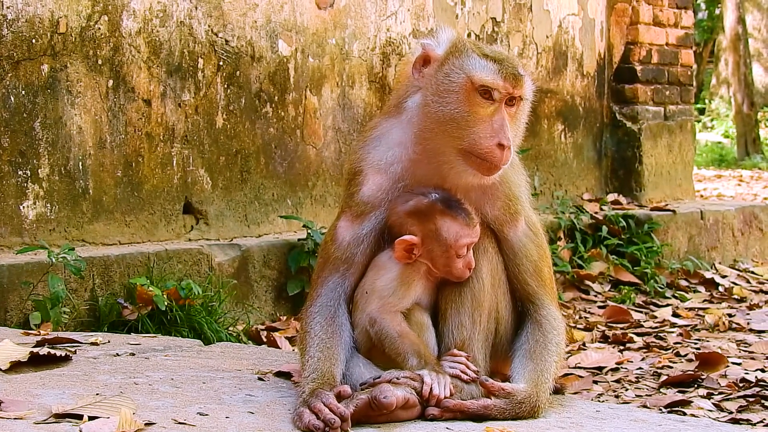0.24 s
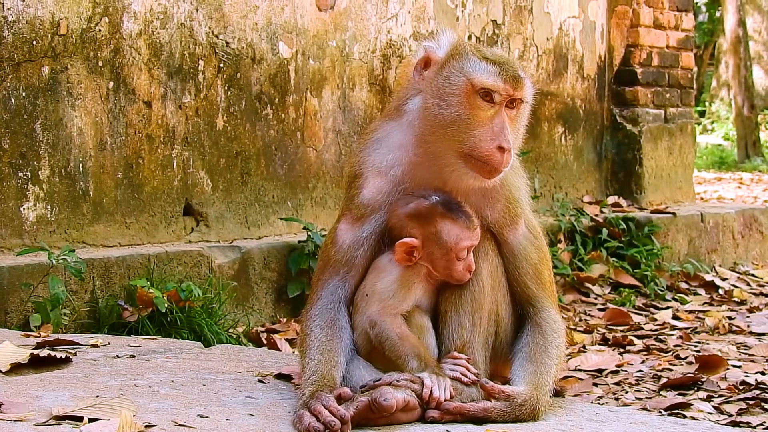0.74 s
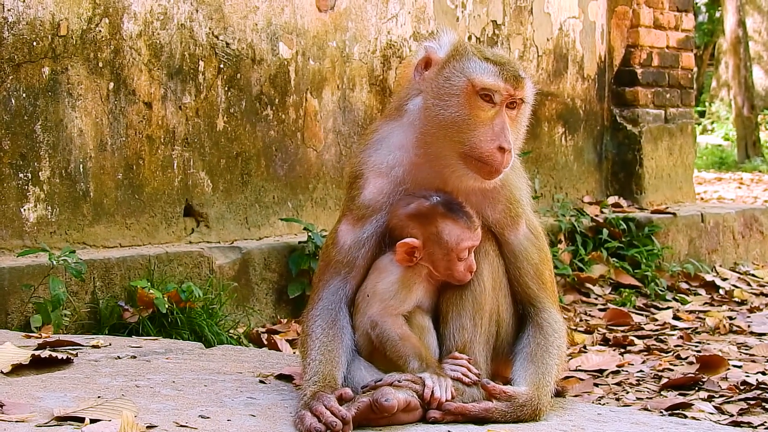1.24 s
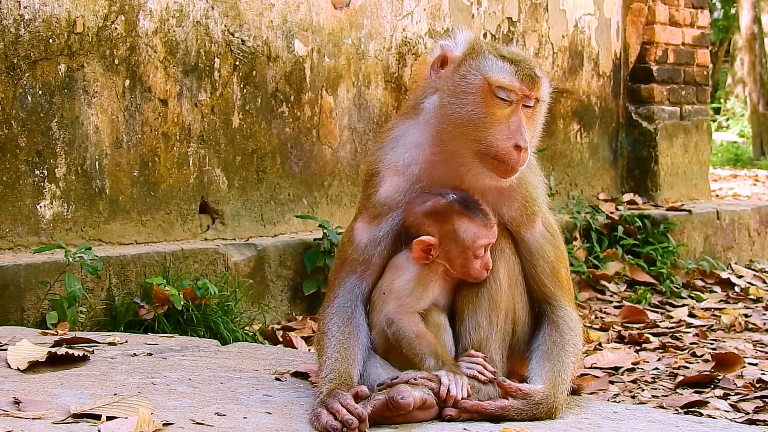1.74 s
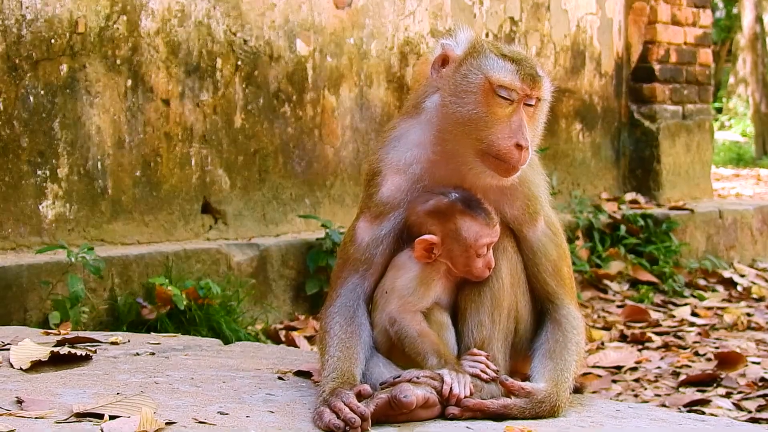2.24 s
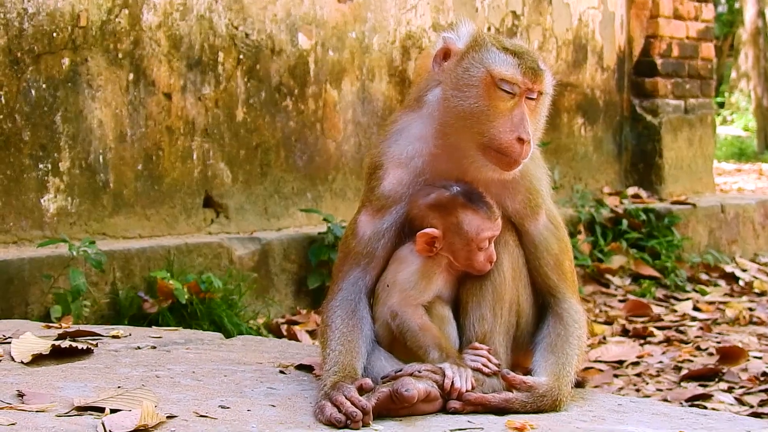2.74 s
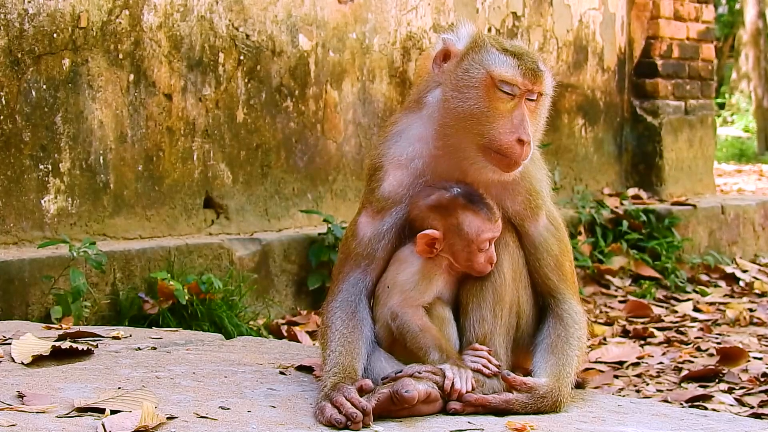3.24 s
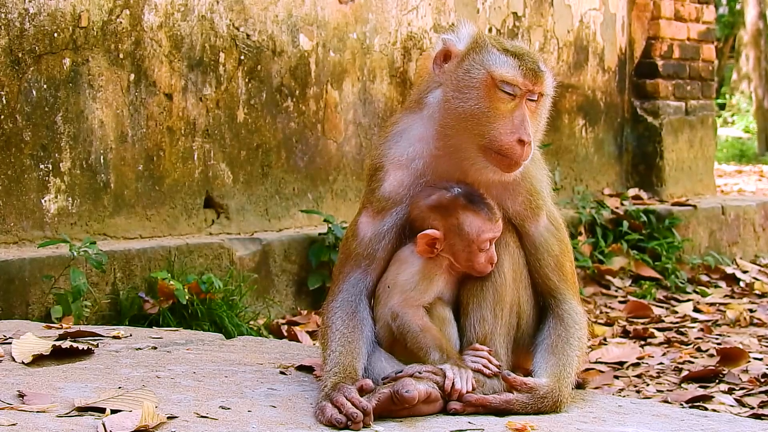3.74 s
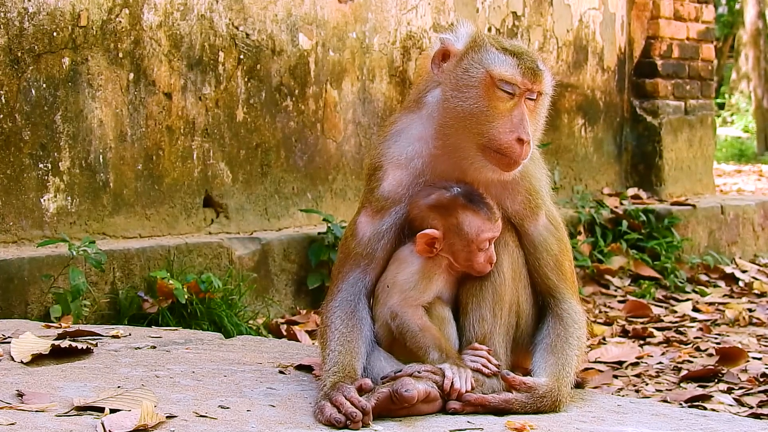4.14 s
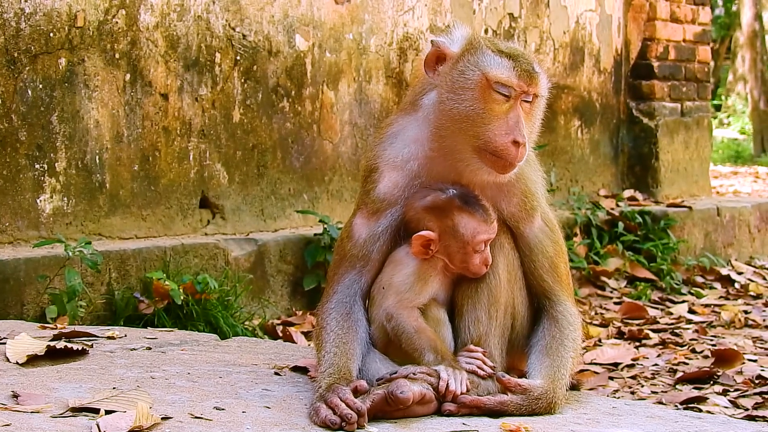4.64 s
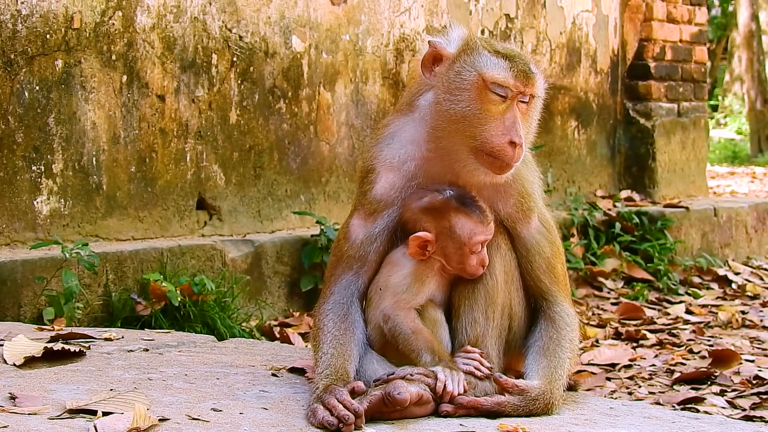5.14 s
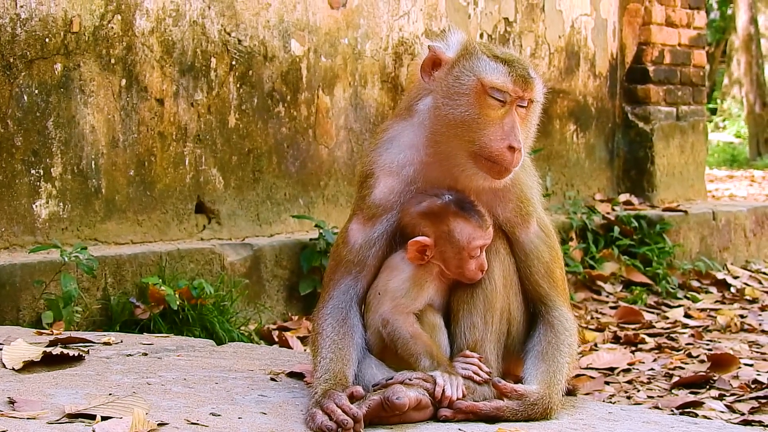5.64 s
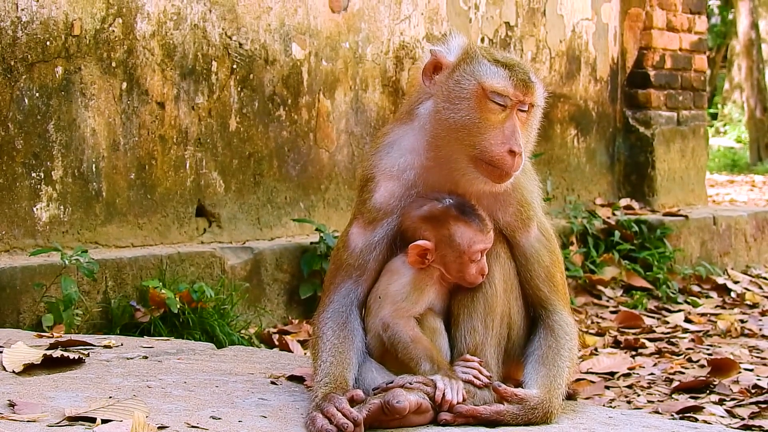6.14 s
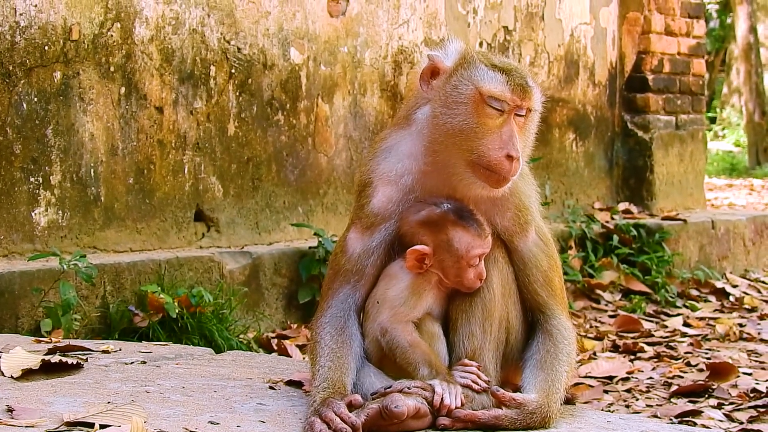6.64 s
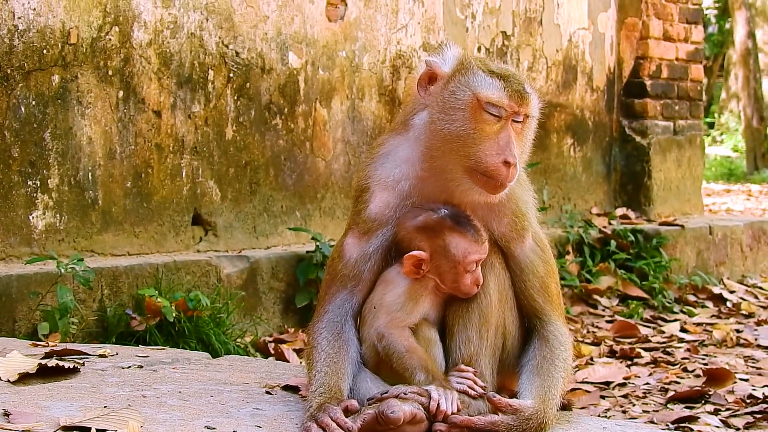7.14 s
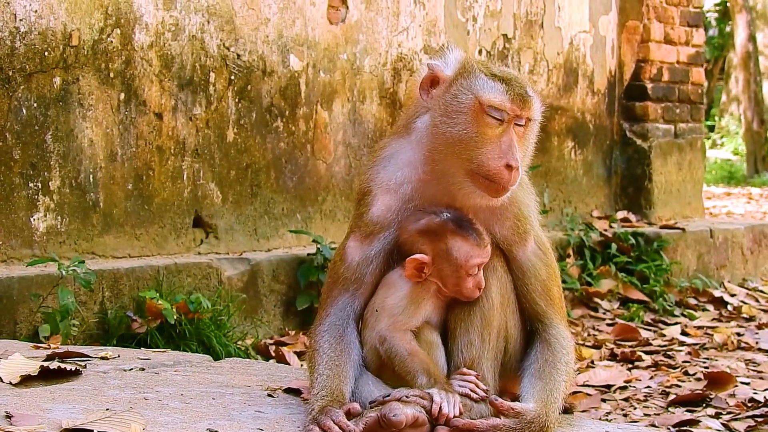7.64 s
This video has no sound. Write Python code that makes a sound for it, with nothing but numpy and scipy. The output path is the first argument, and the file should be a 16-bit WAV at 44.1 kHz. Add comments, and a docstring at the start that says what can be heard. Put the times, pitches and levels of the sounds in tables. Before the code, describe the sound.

Cicadas drone shrilly in a leafy park over a low far traffic rumble, with dry leaf rustles, twig ticks and faint bird whistles.

```python
"""Cicadas drone in the trees of a quiet park, over the rumble of far traffic in which engine notes wander.
Dry leaves rustle, twigs tick, small birds whistle down-and-up sweeps and an animal calls twice from afar.
Cicadas are stacks of sines at fifths of a click rate; traffic, foliage and leaves are shaped noise, ticks
are noise puffs in a resonance, birds are gliding sines and the animal is a harmonic stack through a throat."""
import sys
import numpy as np
from scipy import signal
from scipy.fft import rfft, irfft, next_fast_len
from scipy.io import wavfile
from scipy.ndimage import uniform_filter1d, map_coordinates

SR = 44100
rng = np.random.default_rng(int(sys.argv[2]) if len(sys.argv) > 2 else 0)


def wrap_up_sound(samples):
    """Save the sound to the file named by the first command line argument, as 16-bit audio."""
    columns = np.atleast_2d(samples).T
    # keep every value between -1 and 1, then stretch to whole-number steps
    tamed = np.clip(columns, -1, 1)
    steps = np.round(tamed * 32767).astype(np.int16)
    wavfile.write(sys.argv[1], SR, steps)


N = 347830  # length in samples


def amp(db):
    """Decibels to an amplitude factor."""
    return 10 ** (np.asarray(db) / 20)


def unit(x):
    """x scaled to an RMS of one."""
    return x / np.sqrt(np.mean(x ** 2) + 1e-20)


def along(points, hz):
    """Reads (Hz, value) points on a log frequency axis."""
    point_hz, values = np.transpose(points)
    return np.interp(np.log(hz + 1), np.log(point_hz + 1), values)


def curves(rows):
    """One value per sample for each column after the time."""
    seconds, *columns = np.transpose(rows)
    return [np.interp(np.arange(N) / SR, seconds, column) for column in columns]


def wobble(rate):
    """A smooth random curve with rate knots a second."""
    knots = rng.standard_normal(int(N * rate / SR) + 4)
    return map_coordinates(knots, [np.arange(N) * rate / SR])


def filtered(x, response):
    """x shaped by a complex response of frequency."""
    m = next_fast_len(x.shape[-1] + SR // 2)
    spectrum = rfft(x, m) * response(np.fft.rfftfreq(m, 1 / SR))
    return irfft(spectrum, m)[..., :x.shape[-1]]


# How alike left and right are in a wide sound field. Each row: frequency in Hz, likeness from 0 to 1.
LIKENESS = [(60, 0.99), (160, 0.99), (270, 0.84), (1200, 0.82), (2000, 0.61), (2700, 0.83), (4200, 0.51),
            (5400, 0.64), (6500, 0.054), (8100, 0.049), (10000, 0.033)]


def paired(two, gain):
    """Two unrelated signals mixed to left and right, alike as a microphone pair hears a wide field."""
    def mid_side_gain(hz):
        angle = np.arccos(np.clip(along(LIKENESS, hz), -1, 1)) / 2
        return gain(hz) * np.array([np.cos(angle), np.sin(angle)])
    mid, side = filtered(two, mid_side_gain)
    return np.array([mid + side, mid - side])


def patchy(depth_db):
    """Two noises whose gain drifts in patches of time and frequency."""
    z = signal.stft(rng.standard_normal((2, N)), nperseg=2048)[2]
    field = rng.standard_normal(z.shape[1:])
    for axis in (0, 1):
        field = uniform_filter1d(field, size=4, axis=axis)
    return signal.istft(z * amp(depth_db * unit(field)), nperseg=2048)[1][:, :N]


def trees(x, t60, direct_db):
    """Scattering among trunks and walls: a decaying noise tail behind the direct sound; t60 in s."""
    t = np.arange(int(t60 * SR)) / SR
    tail = paired(rng.standard_normal((2, len(t))) * amp(-60 * t / t60), np.ones_like)
    tail /= np.linalg.norm(tail[0])
    tail[:, 0] += amp(direct_db)
    led_in = np.pad(x, (len(t), 0), "reflect")  # so the scattering is already under way at the start
    return signal.fftconvolve(led_in[None], tail, axes=1)[:, len(t):len(t) + N]


# Colour of the traffic rumble. Each row: frequency in Hz, relative density in dB per Hz.
TRAFFIC_COLOUR = [(15, -33), (25, -29), (33, -30), (48, -4.5), (103, 0), (151, 0), (262, -22), (521, -25),
                  (595, -26.5), (856, -26), (1230, -27), (1730, -32.5), (2060, -35), (2400, -36.5),
                  (3120, -45), (5280, -120)]
# Course of the traffic. Each row: time in seconds, level in dB.
TRAFFIC_LEVEL = [(0, -42), (1.5, -43), (3, -43), (4.5, -42), (6, -43), (7.89, -43.5)]


def traffic():
    """Far traffic blends into a low-heavy noise that is unsteady in time and frequency."""
    level_db, = curves(TRAFFIC_LEVEL)
    rumble = paired(patchy(depth_db=2.5), lambda hz: amp(along(TRAFFIC_COLOUR, hz)))
    return amp(level_db) * unit(rumble)


# Two engine notes, one after the other. Each row of a note: time in seconds, pitch in Hz, mean RMS level in dB.
ENGINE_NOTES = [
    [(0, 107, -47), (.6, 110, -45), (1.1, 115, -49.5), (1.8, 119, -50), (2.5, 121, -62)],
    [(4.5, 127.4, -81), (4.7, 130, -42), (5.2, 147.8, -49), (5.8, 130.2, -47), (6.5, 128.8, -74),
     (6.9, 141, -46.5), (7.5, 149, -47.5), (7.89, 149.7, -51.5)],
]


def engines():
    """Each engine note is a wandering sine of unsteady level that sounds only around its own span."""
    out, t = np.zeros(N), np.arange(N) / SR
    for rows in ENGINE_NOTES:
        hz, db = curves(rows)
        since_start, until_end = t - rows[0][0] + .1, rows[-1][0] + .2 - t
        on = np.clip(np.minimum(since_start, until_end) / .2, 0, 1)
        level = np.sqrt(2) * amp(db + 1.14 * wobble(3.03))
        out += on * level * np.sin(2 * np.pi * np.cumsum(hz) / SR)
    return out


# Unseen machines. Each row: centre in Hz, half width in Hz, level in dB at the start, midway and at the end.
MACHINE_HUMS = [(843, 34, -75, -69.5, -76), (335, 43, -105, -69.5, -65), (155, 30, -64, -54.5, -80)]


def hums():
    """Each machine hum is a narrow band of noise that swells, fades and wavers."""
    out = np.zeros((2, N))
    for centre_hz, half_width_hz, *dbs in MACHINE_HUMS:
        level_db = np.interp(np.linspace(0, 2, N), [0, 1, 2], dbs) + 4.7 * wobble(3.85)
        band = paired(rng.standard_normal((2, N)), lambda f: np.exp(-((f - centre_hz) / half_width_hz) ** 2))
        out += amp(level_db) * unit(band)
    return out


# Foliage hiss. Each row: frequency in Hz, density in dB per Hz before its patches of gain.
FOLIAGE = [(900, -110), (1800, -99), (3500, -98.5), (4400, -97), (6000, -96), (8000, -98), (8800, -105),
           (11000, -113.5), (15600, -120)]


def foliage():
    """Foliage hiss: broad noise in patches of gain, scaled from density per Hz to amplitude."""
    return paired(patchy(depth_db=4.0), lambda hz: amp(along(FOLIAGE, hz)) * np.sqrt(SR / 2))


RUSTLE_WIDTH = .24  # share of side sound in the power
# Colour of dry leaves. Each row: frequency in Hz, relative level in dB.
LEAF_COLOUR = [(1500, -14), (3500, -6), (4300, -3), (6500, 0), (8000, -5), (9300, -17), (12000, -27),
               (15600, -40)]
# Colour of the thud below a rustle. Each row: frequency in Hz, relative level in dB.
THUD_COLOUR = [(200, -32), (500, 10), (1400, 3.5), (2500, 3.5), (4000, -22)]
# Rustles. Each row: middle in seconds, half length in seconds, level in dB, thud in dB against the rustle.
LEAF_RUSTLES = [(0.96, 0.027, -59, -21), (1.072, 0.088, -49, -15), (1.18, 0.025, -63.5, 5),
                (1.646, 0.021, -59, -4), (1.872, 0.03, -53, -21), (3.62, 0.028, -58, 0),
                (4.12, .03, -59, -9), (4.19, 0.045, -64, 7.5), (4.84, 0.038, -56.5, -10),
                (4.684, 0.04, -51, -15), (6.85, 0.06, -52.5, -5.5), (6.008, 0.058, -52, -7.5),
                (6.458, 0.014, -67.5, 12)]


def leaves():
    """Dry leaves: crackly noise under a soft swell; each rustle has its own low thud."""
    out, t = np.zeros((2, N)), np.arange(N) / SR
    crackle = rng.standard_normal((2, N)) * amp(2.5 * wobble(120))
    crisp = unit(filtered(crackle, lambda hz: amp(along(LEAF_COLOUR, hz))))
    thud = unit(paired(crackle, lambda hz: amp(along(THUD_COLOUR, hz)) * (hz > 150)))
    mid = np.sqrt(1 - RUSTLE_WIDTH) * crisp[0]
    side = np.sqrt(RUSTLE_WIDTH) * crisp[1]
    leaf = np.array([mid + side, mid - side])
    for middle, half, db, thud_db in LEAF_RUSTLES:
        swell = amp(db) * np.exp(-((t - middle) / half) ** 2)
        out += swell * (leaf + amp(thud_db) * thud)
    return out


TICK_WIDTH_HZ, TICK_WIDENS = 1500, .3  # resonance width: a base in Hz and a share of the centre
TICK_T60 = .027  # s
# Twig ticks. Each row: start in seconds, peak in dB, resonance centre in Hz.
TWIG_TICKS = [(.727, -47, 2800), (1.85, -48, 1000), (2.05, -40.5, 850), (2.495, -41, 1500),
              (2.502, -46, 4500), (2.652, -47, 9500), (3.172, -44, 1195), (3.182, -53, 8000),
              (3.505, -44, 700), (3.515, -56, 10000), (3.6, -41, 1800), (3.619, -43, 1500),
              (3.625, -45, 5000), (3.7, -52, 4200), (4.097, -43, 3300), (4.112, -43, 4300),
              (4.33, -61, 8000), (6.18, -48, 3800)]


def twigs():
    """Each tick is a fast-dying puff of noise in one broad, steep-sided resonance."""
    out, t = np.zeros((2, N + SR)), np.arange(SR // 20) / SR
    for start, db, hz in TWIG_TICKS:
        width_hz = TICK_WIDTH_HZ + TICK_WIDENS * hz

        def resonance(f):
            band = 1j * f * width_hz / (hz * hz - f * f + 1j * f * width_hz)
            return band ** 2 / (1 + 1j * f / 11000) ** 4  # the divisor softens the treble
        puff = rng.standard_normal(len(t)) * amp(-60 * t / TICK_T60)
        tick = filtered(puff, resonance)
        out[:, round(start * SR):][:, :len(t)] += amp(db) * tick / np.abs(tick).max()
    return out[:, :N]


SAG_S, MOUTH_S = .05, .07  # time constant of the pitch sag, time for the mouth to open
CALL_ATTACK_S, CALL_RELEASE_S, CALL_FADE_DB = .02, .04, -7  # the fade runs over the whole call
# Throat resonances. Each row: frequency in Hz, relative level in dB.
THROAT_COLOUR = [(600, -30), (1300, -8), (1750, -1), (2100, 0), (2400, -8), (2950, 0), (3500, -2),
                 (4600, -2), (5500, -12)]
# Calls. Each row: start in seconds, length in seconds, first pitch in Hz, settled pitch in Hz,
# level in dB ahead of the throat and the trees, widest mouth from 0 to 1.
ANIMAL_CALLS = [(1.285, .19, 790, 648, -52.5, 1), (5.03, .28, 710, 592, -59, .8)]


def animal():
    """A falling, hoarse stack of harmonics through the throat; an opening mouth frees the upper ones."""
    out = np.zeros(N)
    for start, length, first_hz, settled_hz, level_db, widest in ANIMAL_CALLS:
        t = np.clip(np.arange(N) / SR - start, 0, None)
        hz = settled_hz + (first_hz - settled_hz) * np.exp(-t / SAG_S)
        mouth = widest * np.clip(t / MOUTH_S, 0, 1)
        gate = np.clip(np.minimum(t / CALL_ATTACK_S, (length - t) / CALL_RELEASE_S), 0, 1)
        on = gate * amp(level_db + CALL_FADE_DB * np.minimum(t / length, 1))
        phase = 2 * np.pi * np.cumsum(hz * (1 + .02 * wobble(120))) / SR
        for k in range(1, 9):
            muffle_db = -10 * (1 - mouth) * max(k - 4, 0)
            harmonic_db = along(THROAT_COLOUR, k * hz) + muffle_db + 3 * wobble(60)
            out += on * amp(harmonic_db) * np.sin(k * phase)
    return trees(out, t60=.45, direct_db=-2)  # more scattered than direct sound


FALL_DB, TURN_DB = -3, -8  # level just after the onset and at the lowest point of a sweep, against its loudest
NOTE_S, NOTE_WAVER = .048, .012  # length of a level note in s, waver as a share of the pitch
# Two birds. Each row: lowest pitch in Hz, fall in Hz per second, rise in Hz per second.
BIRD_TURNS = [(4500, 22000, 23000), (4900, 16500, 20000)]
# Sweeps. Each row: lowest point in seconds, bird, start in Hz, end in Hz, loudest in dB before the flutter.
BIRD_SWEEPS = [(.78, 0, 6200, 6200, -55), (1.78, 0, 6200, 6400, -54), (2.02, 1, 6400, 7300, -54),
               (3.237, 0, 6300, 6900, -49), (3.99, 1, 6500, 7300, -55), (4.87, 0, 6100, 6700, -53),
               (6.1, 1, 6500, 7250, -52)]
# Level notes. Each row: start in seconds, pitch in Hz, loudest in dB before the flutter.
BIRD_NOTES = [(.85, 6000, -53), (.9, 5830, -55), (5.18, 5950, -55), (5.24, 6000, -52), (5.3, 6070, -56),
              (7.649, 5900, -52), (7.69, 6350, -57)]


def birds():
    """Fluttering sine whistles: sweeps that fall and rise at each bird's own speed, and short level notes."""
    out = np.zeros(N)
    for turn_s, bird, start_hz, end_hz, peak_db in BIRD_SWEEPS:
        low_hz, fall, rise = BIRD_TURNS[int(bird)]
        start_s = turn_s - (start_hz - low_hz) / fall
        end_s = turn_s + (end_hz - low_hz) / rise
        t = np.arange(start_s, end_s, 1 / SR)
        hz = np.interp(t, [start_s, turn_s, end_s], [start_hz, low_hz, end_hz])
        shape_s = [start_s, start_s + .01, turn_s, end_s - .02, end_s]
        db = peak_db + np.interp(t, shape_s, [-18, FALL_DB, TURN_DB, 0, -15])
        out[round(start_s * SR):][:len(t)] += amp(db) * np.sin(2 * np.pi * np.cumsum(hz) / SR)
    t = np.arange(0, NOTE_S, 1 / SR)
    waver = 1 + NOTE_WAVER * wobble(60)
    for start_s, hz, db in BIRD_NOTES:
        first = round(start_s * SR)
        phase = 2 * np.pi * hz * np.cumsum(waver[first:][:len(t)]) / SR
        out[first:][:len(t)] += amp(db) * np.sin(np.pi * t / NOTE_S) * np.sin(phase)
    return trees(out * amp(3 * wobble(90)), t60=.7, direct_db=0)


# Far cicadas blurred by distance. Each row: centre in Hz, width in Hz, relative level in dB.
CHORUS_HUMPS = [(2663, 200, -1), (5320, 540, -4.5), (6340, 1540, -7.5)]


def far_chorus():
    """Far cicadas blur into humps of noise of slightly unsteady level."""
    def humps(f):
        power = sum(amp(2 * db) / (1 + ((f - centre) / (width / 2)) ** 4) for centre, width, db in CHORUS_HUMPS)
        return np.sqrt(power)
    blur = unit(paired(rng.standard_normal((2, N)), humps))
    return blur * amp(-56 + .32 * wobble(12.0))


FLARES, FLARE_SHARE = (.1, .64), .075  # where in the cycle the song brightens, and half length, as shares
DULL_DB, FLARE_DB = -6.5, 14.5  # brightness between flares, and what a flare adds
RIGHT_LEAD_S = 12e-6  # the right side hears them this much earlier
# One song cycle. Each row: share of the cycle, click rate in Hz.
SONG_CYCLE = [(0, 2710), (.35, 2689), (.5, 2713), (.72, 2717), (.87, 2697), (1, 2710)]
# Clicks come in groups of five, so lines stand at fifths of the click rate.
# Each row: number of fifths, relative level in dB.
SONG_LINES = [(5, -3.5), (6, -23.5), (7, -28), (8, -24.5), (9, -19.5), (10, 5), (11, -10.5), (12, -15.5),
              (13, -36), (14, -17), (15, -6.5), (16, -26), (19, -35), (20, -25.5)]
# Singers. Each row: pitch offset in Hz, share of the pitch swing, cycle in seconds, head start in seconds,
# level in dB ahead of lines and trees, direct sound in dB against the scattering.
CICADA_SINGERS = [(-2, .9, .792, 0.0039, -57.5, 0), (7, 0.2987, .7, .3, -54, -7),
                  (-6, 0.407, .41, 0.0965, -58, -4.5), (8, .3, .53, 0.3973, -56, -8),
                  (26, 0.78, .37, 0.202, -61, -3), (-22, .6, .9, .5, -63, -18)]


def cicadas():
    """Each singer repeats the song cycle; its wavering lines fade in and out through the scattering."""
    out, t = np.zeros((2, N)), np.arange(N) / SR
    share, rate_hz = np.transpose(SONG_CYCLE)
    mean_hz = rate_hz.mean()
    for offset_hz, swing, cycle, head_start, db, direct_db in CICADA_SINGERS:
        place = ((t + head_start) / cycle + .02 * wobble(1)) % 1
        swing_hz = swing * (np.interp(place, share, rate_hz) - mean_hz)
        click_hz = mean_hz + offset_hz + swing_hz + 5 * wobble(30)
        phase = 2 * np.pi * np.cumsum(click_hz) / SR / 5  # of one group of five clicks
        flare = sum(np.exp(-((place - at) / FLARE_SHARE) ** 2) for at in FLARES)
        bright = swing * (DULL_DB + FLARE_DB * flare) + 1.5 * direct_db  # far singers lose treble
        song = np.zeros(N)
        for k, line_db in SONG_LINES:
            # brightness tilts the lines above the strongest one, more the higher they lie
            tilt_db = bright * max(k / 10 - 1, 0) ** 2
            song += amp(line_db + tilt_db) * np.sin(k * phase + rng.uniform(0, 2 * np.pi))
        out += trees(amp(db + 2.46 * wobble(25)) * song, t60=.9, direct_db=direct_db)
    sides = np.array([[-1], [1]])
    return filtered(out, lambda f: np.exp(1j * np.pi * f * RIGHT_LEAD_S * sides))


def scene():
    """All layers, from the far background to the singing cicadas."""
    background = traffic() + engines() + hums() + foliage()
    return background + leaves() + twigs() + animal() + birds() + far_chorus() + cicadas()


TOP_HZ = 15680  # nothing passes from here up
NOTCH_HZ, NOTCH_STEP_HZ, NOTCH_WIDTH_HZ = 3824, 98.3, 17  # middle notch, spacing, half width
NOTCH_DEPTH, NOTCH_SPAN_HZ = .62, 260  # deepest dip 0-1, and how far from the middle the dips fade
# Balance of the two sides. Each row: frequency in Hz, left against right in dB.
BALANCE = [(100, 0.56), (2000, 0.6), (5400, -0.8), (8100, 1.9), (12000, -0.5)]


def record(dry):
    """Evenly spaced narrow notches around 3.8 kHz, sides of unequal colour and a band limit."""
    def notches(f):
        off_hz = (f - NOTCH_HZ + NOTCH_STEP_HZ / 2) % NOTCH_STEP_HZ - NOTCH_STEP_HZ / 2  # from the nearest notch
        span = ((f - NOTCH_HZ) / NOTCH_SPAN_HZ) ** 2
        return 1 - NOTCH_DEPTH * np.exp(-span - (off_hz / NOTCH_WIDTH_HZ) ** 2)

    def response(hz):
        sides = amp(along(BALANCE, hz) * np.array([[.5], [-.5]]))
        return notches(hz) * sides * (hz < TOP_HZ)
    return filtered(dry, response)


dry = scene()
out = record(dry)
wrap_up_sound(out)
```